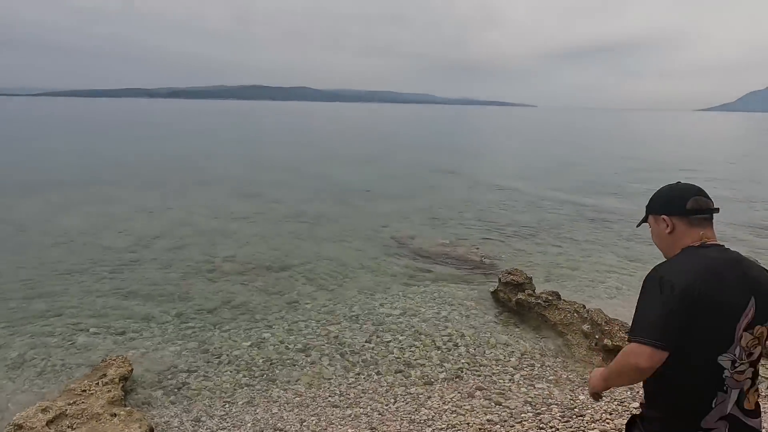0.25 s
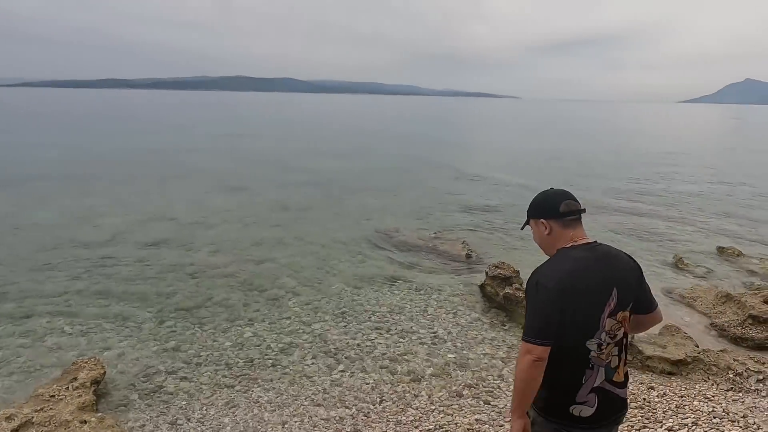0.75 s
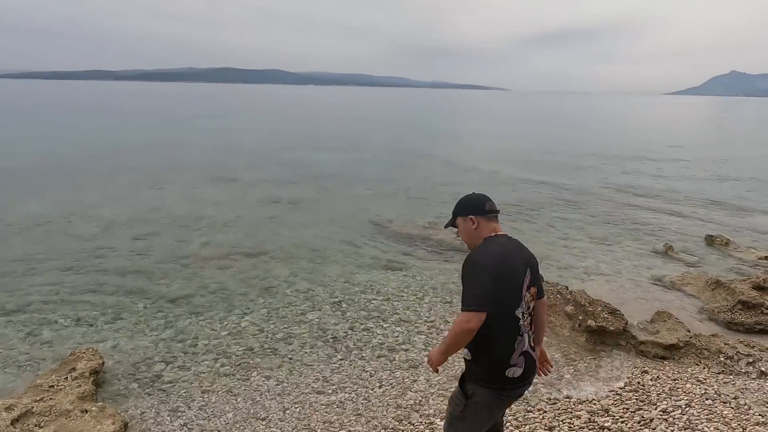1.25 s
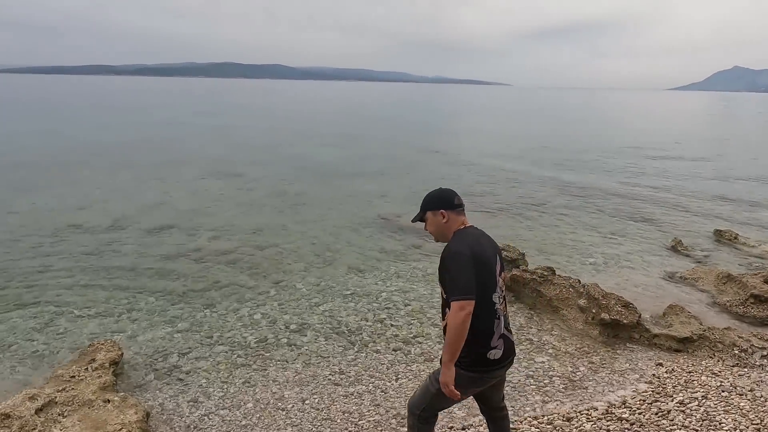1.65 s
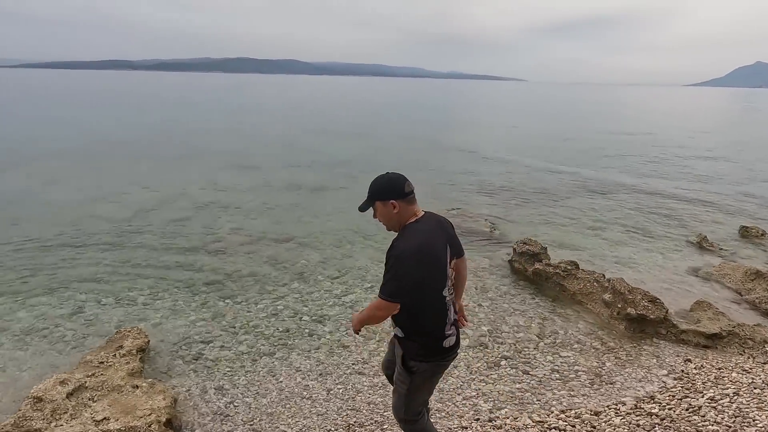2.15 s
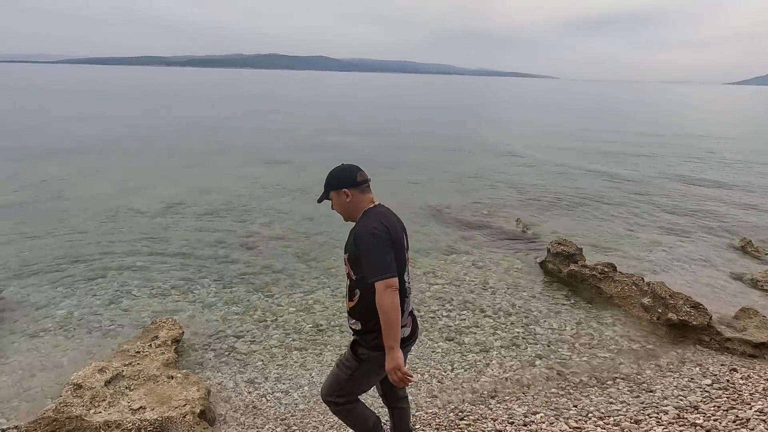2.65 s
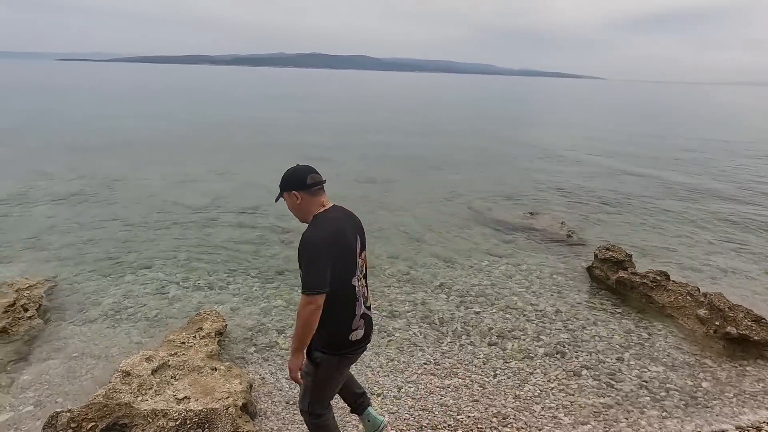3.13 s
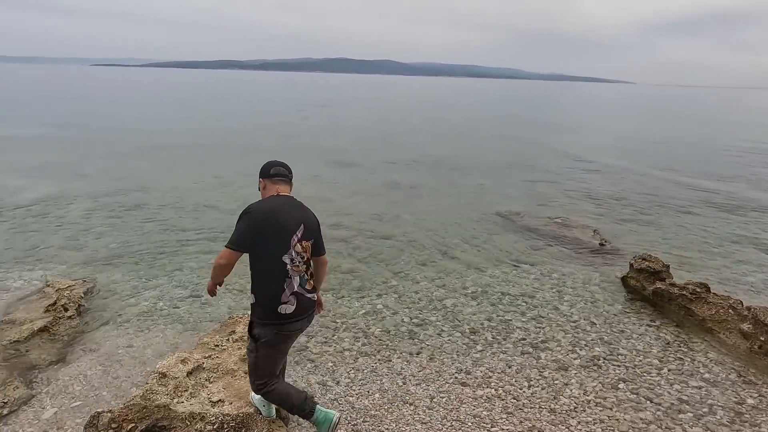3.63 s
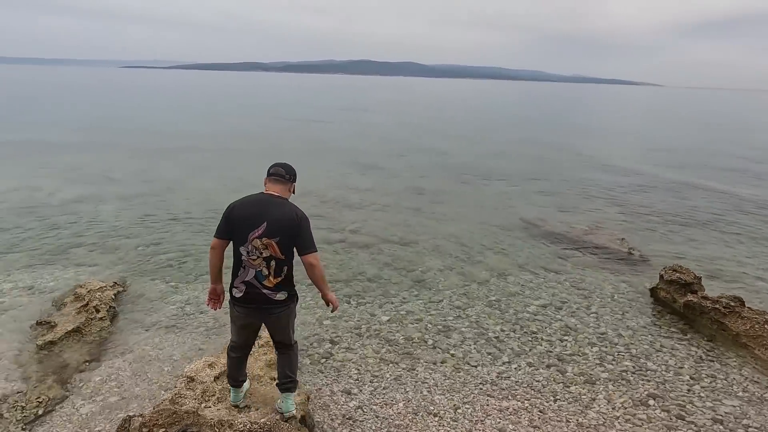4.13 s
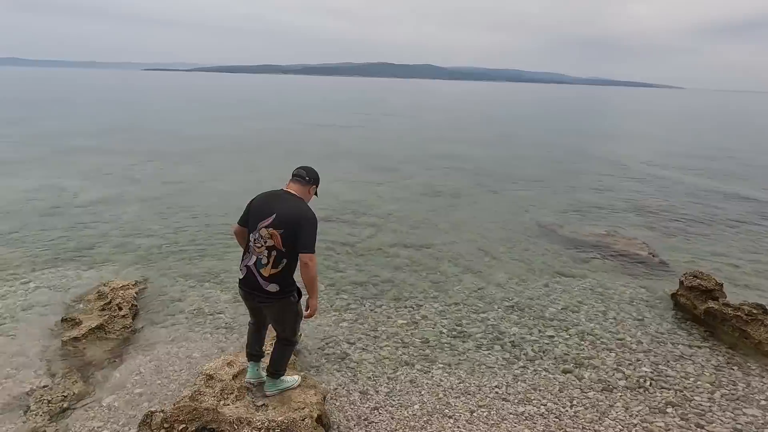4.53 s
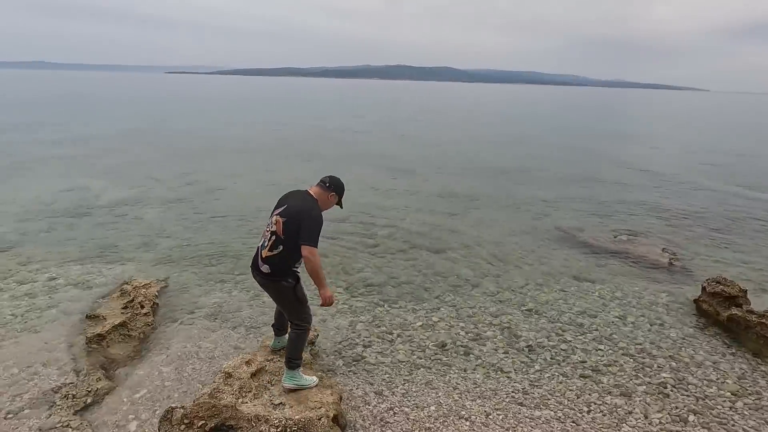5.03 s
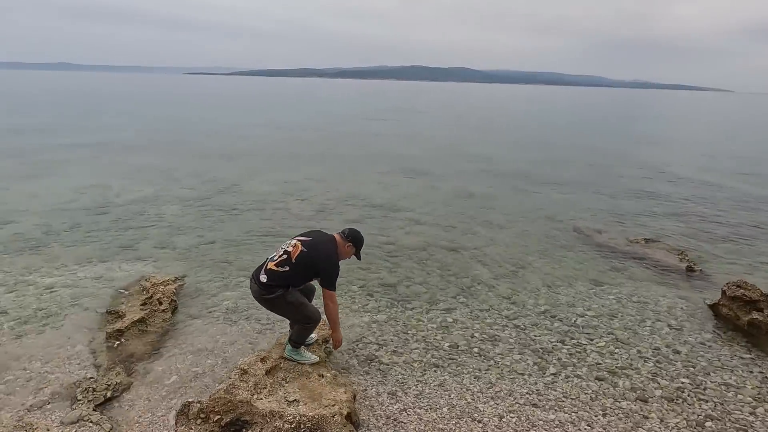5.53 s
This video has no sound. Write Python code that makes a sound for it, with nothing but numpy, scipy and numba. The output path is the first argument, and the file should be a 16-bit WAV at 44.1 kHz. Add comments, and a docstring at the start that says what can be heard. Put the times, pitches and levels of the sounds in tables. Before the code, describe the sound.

Shoes crunch loudly and briskly over loose pebbles with sharp stone clacks, then stop, leaving calm water lapping, plopping and ticking at the shore.

```python
"""A pebble beach: shoes crunch a few metres from a hand-held camera, and the crunching dies out before 4 s.
Steps are thousands of tiny ringing stone contacts that follow the load of each foot; single stones clack.
Calm water laps, plops and gurgles: bubbles ring with rising pitch, droplets tick and spray hisses.
A breeze buffets the microphones as low noise, over a distant sea of smooth noise and a faint hum."""
import sys
import numpy as np
from scipy import signal
from scipy.fft import rfft, irfft, next_fast_len
from scipy.io import wavfile
from scipy.ndimage import uniform_filter1d
from numba import njit

SR = 44100
rng = np.random.default_rng(int(sys.argv[2]) if len(sys.argv) > 2 else 0)


def int16_out(signal):
    """Quantize to a 16-bit WAV file."""
    q = np.round(np.clip(np.atleast_2d(signal).T, -1, 1) * 32767)
    wavfile.write(sys.argv[1], SR, q.astype(np.int16))


def decibels_to_gain(level_db):
    """Convert a level in decibels to a linear amplitude gain (20 dB per decade)."""
    exponent = np.asarray(level_db, float) / 20
    return 10 ** exponent


N = 254898

# Where the walker is. Each row: time in seconds, left minus right in dB.
WALKER = [(0.0, -3), (1.0, -2), (2.0, -.5), (3.0, -2), (3.7, -2)]
# Tone colour of the sea hiss, also given to the spray. Each row: frequency in Hz, relative density in dB per Hz.
SEA_COLOUR = [(59, 5), (100, -14), (189, -5.5), (373, -5), (433, -4.5), (836, -28), (1080, 0.5),
              (1330, 0.5), (4020, -12.5), (5190, -25), (7140, -15.5), (11900, -27.5), (16000, -39)]


def set_level(x, db):
    """Scale a sound to an rms level in dB."""
    return x * decibels_to_gain(db) / np.sqrt(np.mean(x ** 2))


def along_hz(table, hz):
    """Read a spectrum table on a log-frequency axis."""
    points, values = np.transpose(table)
    return np.interp(np.log(hz + 1), np.log(points + 1), values)


def colour(x, table):
    """Filter with the given dB spectrum; folding the cepstrum makes the filter respond only after its input."""
    size = 4096
    log_gain = np.log(decibels_to_gain(along_hz(table, np.fft.rfftfreq(size, 1 / SR))))
    cepstrum = irfft(log_gain)
    cepstrum[1:size // 2] *= 2
    response = irfft(np.exp(rfft(cepstrum[:size // 2], size)), size)
    return signal.fftconvolve(x, response[None], axes=1)[:, :N]


def wander(rate):
    """Random values held for 1 / rate seconds, then smoothed twice; spread near 1."""
    k = int(SR / rate)
    held = np.repeat(rng.standard_normal(N // k + 1), k)
    return 1.135 * uniform_filter1d(uniform_filter1d(held, k), k)[:N]


def noise(width):
    """Two channels of noise that share most of their wave; width sets the part that differs."""
    mid, side = rng.standard_normal((2, N))
    return mid + width * side * np.array([[1], [-1]])


@njit
def rings(s, hz, t60, glide, size, pan, skew):
    """Decaying sines; pitch rises by the share glide over t60; skew is the phase gap between the ears."""
    out = np.zeros((2, N))
    for k in range(len(s)):
        length = t60[k] * SR
        z = size[k] + 0j
        turn = np.exp(1j * skew[k] / 2)
        p = np.exp(2j * np.pi * hz[k] / SR - np.log(1000) / length)
        rise = np.exp(2j * np.pi * hz[k] * glide / SR / length)
        start = int(s[k] * SR)
        for i in range(start, min(start + int(length), N)):
            soft = min((i - start) * hz[k] * 2 / SR, 1.)  # contact builds over half a cycle
            out[0, i] += soft * pan[k] * (z * turn).imag
            out[1, i] += soft / pan[k] * (z / turn).imag
            z, p = z * p, p * rise
    return out


def grains(count, span, low_hz, high_hz):
    """Random times, log-spread pitches, exponential size draws and two normal draws for variety."""
    u = rng.random((count, 3)).T
    place = rng.standard_normal((count, 2)).T
    s = span[0] + (span[1] - span[0]) * u[0]
    hz = low_hz * (high_hz / low_hz) ** u[1]
    return s, hz, -np.log(1 - .999 * u[2]), place


def bursts(rate, fade_s, scatter_db):
    """Envelope of sudden slips, about rate a second, that die away; mean power 1."""
    kicks = (rng.random(N) < rate / SR) * decibels_to_gain(-scatter_db * np.log(1 - .99 * rng.random(N)))
    envelope = signal.lfilter([1], [1, -np.exp(-1 / (fade_s * SR))], kicks)
    return envelope / np.sqrt(np.mean(envelope ** 2))


def knock(s, strength_db, hz, t60, pan_db, count):
    """A main ring inside a cluster of random partner modes; higher modes die sooner."""
    out = rings(s, hz, t60, 0., decibels_to_gain(strength_db - 8), decibels_to_gain(pan_db / 2), 0 * s)
    for u in rng.random((len(s), 2 * count)).T.reshape(count, 2, -1):
        ring_hz = 900 * 15.54 ** u[0] ** 0.68
        ring_t60 = 0.88 * t60 * (4000 / ring_hz) ** 0.091
        # partners far from the main ring are weaker
        db = strength_db - 9.5 - 3.6 * np.abs(np.log2(ring_hz / hz))
        out = out + rings(s + .001 * u[1], ring_hz, ring_t60, 0., decibels_to_gain(db), decibels_to_gain(pan_db / 2), .6 * (u[1] - .5))
    return out


def swell(s, crest, db, rise, hold, fall):
    """Level in dB of each event (columns) at each time (rows): straight rise, hold, straight fall."""
    s = s[:, None]
    before_db = 20 * np.clip((crest - s) / rise, 0, None)
    after_db = 20 * np.clip((s - crest - hold) / fall, 0, None)
    return db - before_db - after_db


def total(db):
    """Power sum of levels along each row."""
    return 10 * np.log10(np.sum(decibels_to_gain(db) ** 2, axis=1) + 1e-18)


def step_load(s, coarse=0., fine=0.):
    """Grinding level under all steps, each with a trickling tail, for stones of the given coarse or fine share."""
    # Feet loading the pebbles. Each row: start of full weight in seconds, relative level in dB,
    # rise in seconds per 20 dB (0 is at once; a negative one quickens the fall), hold in seconds,
    # fall in seconds per 20 dB, extra level of coarse stones in dB, extra level of fine stones in dB.
    steps = [(0.0, -20, -0.5, 0.03, .26, -13, -2.5), (0.278, -19.5, 0.12, .14, .18, -2, -2),
             (0.521, -41, 0, .17, 0.28, -6, 17), (.772, -19, .1, .18, .1, -1, 0),
             (1.045, -31.5, .06, .07, .15, 6, 3), (1.14, -24, .02, .06, 0.25, -8, 5),
             (1.238, -18.5, .12, 0.069, .45, -7, -3), (1.42, -23, .3, .06, .45, -1, 0),
             (1.62, -29, .3, .13, .06, -4, 2), (1.812, -23.5, .012, 0.024, .1, -11, 5.5),
             (2.134, -23, .6, .11, .17, -2.5, -6), (2.429, -26, 0.08, 0.022, 0.12, -6, 4),
             (2.478, -18, 0.02, 0.007, .07, -10, -4), (2.53, -27, .05, .02, .2, -8, -4),
             (2.699, -26.5, 0.3, .04, .05, -10, -7), (2.76, -34, .05, .07, .1, 7, -14),
             (2.869, -29, 0.08, .03, .1, -2, -22), (3.036, -19.5, 0.14, 0.053, 0.21, -1, -6),
             (3.23, -26, .12, .04, .12, -3, -9), (3.4, -35, .1, .04, .1, 0, -10),
             (3.61, -25, .14, .04, .07, -4, -7)]
    crest, db, rise, hold, fall, coarse_db, fine_db = np.transpose(steps)
    coarse, fine = np.reshape(coarse, (-1, 1)), np.reshape(fine, (-1, 1))
    lag = np.minimum(0.03 * coarse, hold)  # seconds; big stones give way later
    step_db = db + coarse * coarse_db + fine * fine_db
    step = swell(s, crest + lag, step_db, rise, hold - lag, fall)
    # loose stones trickle on: quieter than the step, duller, slow to fade (0.9 s per 20 dB)
    tail_db = db - 21.5 + coarse * coarse_db - 5 * fine
    tail = swell(s, crest, tail_db, rise, hold, 0.9)
    return total(np.hstack([step, tail]))


def crunch():
    """Thousands of stone contacts a second; light load leaves quieter, more uneven ticks."""
    # Typical ring of coarse, middle and fine stones in Hz.
    stone_hz = (556, 2520, 9000)
    # Tone colour of the pebbles. Each row: frequency in Hz, relative density in dB per Hz.
    pebble_colour = [(88, -46), (150, -37), (231, 1), (466, -4.5), (612, 3.5), (837, 1), (1120, 4),
                     (2060, 0), (3770, 0.5), (4670, -2.5), (6770, 2), (8560, -5), (10400, -0.5),
                     (13200, -10), (16000, -25)]
    s, hz, draw, place = grains(count=57000, span=(0., 4.), low_hz=278.8, high_hz=16370.0)
    fineness = np.interp(np.log(hz), np.log(stone_hz), [-1, 0, 1])  # -1 coarse, 1 fine
    grit_db = step_load(s, np.clip(-fineness, 0, 1), np.clip(fineness, 0, 1))
    slack = np.clip((-28.5 - step_load(s)) / 15, 0, 1)  # 0 under full weight, 1 when stones just trickle
    scatter_db = np.clip(0.76 + 0.5 * slack + 0.45 * fineness, 0, 4)
    even = np.sqrt(3.5 - scatter_db * np.log(10) / 10)  # offsets the power added by scatter
    share = np.clip(0.09 + 0.6 * slack, 0, .95)
    slip_envelope = bursts(rate=120., fade_s=0.011, scatter_db=5.5)
    slips = 1 - share + share * slip_envelope[(s * SR).astype(int)]
    gain = decibels_to_gain(grit_db + scatter_db * draw) * even * slips * hz / 1000
    t60 = 9.6 * np.exp(0.31 * place[0]) / hz
    pan = decibels_to_gain(np.interp(s, *np.transpose(WALKER)) / 2 + 0.48 * place[0])
    skew = (0.1 + (hz / 12500) ** 9) * place[1]  # the ears differ most in the treble
    contacts = rings(s, hz, t60, 0., gain, pan, skew)
    return decibels_to_gain(-11.0) * colour(contacts, pebble_colour)


def breeze():
    """Low noise that swells and drops as wind buffets the microphones, and dull knocks through the camera body."""
    # Wind strength. Each row: time in seconds, level in dB.
    gusts = [(0.0, -25.5), (0.09, -40), (0.3, -32), (0.51, -33), (0.76, -39), (0.84, -25), (1.05, -46),
             (1.58, -35.5), (1.72, -42), (2.11, -31), (2.32, -43.5), (2.82, -37), (2.97, -45), (3.09, -38),
             (3.4, -47), (3.9, -43), (4.17, -52), (4.28, -36), (4.52, -49), (4.68, -38), (4.95, -45),
             (5.54, -40.5), (5.78, -43.5)]
    # Dull knocks. Each row: start in seconds, strength in dB, ring in Hz, time to fall 60 dB in seconds.
    thumps = [(0.831, -10, 21.7, 0.37), (1.457, -16.5, 238, 0.092)]
    rumble_colour = [(8, 0), (20, 2.5), (40, -5.5), (62, -2.5), (80, -18.0), (110, -13.5),
                     (300, -28), (2000, -85)]  # Hz, relative dB
    rumble = set_level(colour(noise(0.11), rumble_colour), 0)
    gust_db = np.interp(np.arange(N) / SR, *np.transpose(gusts))
    s, strength_db, hz, t60 = np.transpose(thumps)
    knocks = rings(s, hz, t60, 0., -decibels_to_gain(strength_db), 1 + 0 * s, 0 * s)
    return rumble * decibels_to_gain(gust_db) + knocks


def sea():
    """Smooth distant hiss from coloured noise, and a hum of sines wavering in level and pitch."""
    # Hum tones. Each row: average frequency in Hz, average level in dB.
    hum_tones = [(92, -50.5), (366, -62)]
    hiss = set_level(colour(noise(0.35), SEA_COLOUR), -47) * decibels_to_gain(0.35 * wander(12))
    hum = 0
    for hz, db in hum_tones:
        strength = decibels_to_gain(db + 0.89 * wander(4.36))
        moving_hz = hz * (1 + 0.0064 * wander(4.3))
        hum = hum + strength * np.sin(2 * np.pi * np.cumsum(moving_hz) / SR)
    return hiss + hum


def water_motion(s, table, rise, fall, calm_db, calm_hz, wet_db, wet_hz):
    """Level and mean pitch of surges, calm water and wet stones underfoot, weighted by their power."""
    crest, length, surge_db, surge_hz = np.transpose(table)
    surges = swell(s, crest, surge_db, rise, length, fall)
    db = np.column_stack([surges, calm_db + 0 * s, step_load(s) + wet_db])
    hz = np.append(surge_hz, [calm_hz, wet_hz])
    return total(db), decibels_to_gain(db) ** 2 @ hz / np.sum(decibels_to_gain(db) ** 2, axis=1)


def lapping():
    """Overlapping bubbles and spray in flurries; bubbles ring with rising pitch, and droplets tick."""
    # Wavelets fizzing on the rocks. Each row: crest in seconds, length in seconds,
    # relative level in dB, favoured bubble pitch in Hz.
    wavelets = [(3.72, .12, -40, 1400), (3.95, .14, -38, 2000), (4.25, .05, -39, 1150),
                (4.4, .03, -41, 800), (4.5, .16, -35.5, 1250), (4.78, .04, -43, 1800),
                (5.02, 0.05, -37, 1950), (5.18, .02, -43, 1500), (5.32, .13, -40.5, 1600),
                (5.55, .06, -48, 1400), (5.773, .03, -46, 2000)]
    # Surge rise and fall in seconds per 20 dB; calm water's relative level in dB and pitch in Hz;
    # wet stones' level against the step in dB and pitch in Hz.
    fizz_settings = dict(rise=.15, fall=.22, calm_db=-49, calm_hz=1700, wet_db=-10, wet_hz=1600)
    # The loudest bubbles. Each row: start in seconds, strength in dB, starting pitch in Hz.
    loud_bubbles = [(4.002, -32, 1750), (4.049, -33, 2120), (4.13, -33, 644), (4.268, -28, 970),
                    (4.301, -31, 620), (4.403, -30, 1020), (4.483, -24, 1260), (4.502, -21.5, 1090),
                    (4.521, -26, 1570), (4.583, -30, 1000), (4.642, -31, 1220), (4.779, -31, 2050),
                    (4.821, -31, 2400), (5.014, -30.5, 860), (5.037, -24, 2610), (5.086, -22, 1810),
                    (5.134, -26.5, 2070), (5.261, -33.5, 1460), (5.327, -30, 820), (5.418, -28.5, 1130),
                    (5.532, -33, 1300), (5.575, -32, 1260), (5.628, -26, 1440), (5.684, -25.5, 2260)]
    # Droplets and small stones ticking at the waterline. Each row: start in seconds, strength in dB, ring in Hz.
    ticks = [(3.7383, -24, 6480), (3.832, -30, 2860), (3.8708, -17.5, 9100), (3.9019, -28, 4400),
             (4.046, -26, 2990), (4.086, -25, 6760), (4.107, -22.5, 3500), (4.523, -18.5, 2800),
             (4.6572, -23.5, 3150), (4.8922, -27, 4100), (4.9595, -23, 2880), (5.4038, -24, 7400),
             (5.6779, -29, 6950), (5.7346, -25, 7510), (5.7494, -21, 10500)]
    left_db = 2.5 / 2  # half the left minus right dB: fizz and plops lie a little to the left

    s, hz, draw, place = grains(count=9000, span=(0, N / SR), low_hz=540.0, high_hz=4880.0)
    wash_db, pitch_hz = water_motion(s, wavelets, **fizz_settings)
    flurry = .5 + .45 * bursts(rate=28.0, fade_s=0.021, scatter_db=2.5)[(s * SR).astype(int)]
    off_pitch_db = 10.5 * np.abs(np.log2(hz / pitch_hz))
    gain = decibels_to_gain(wash_db + 3.16 * np.minimum(draw, 4.5) - 4 - off_pitch_db) * flurry
    fizz = rings(s, hz, 36.0 / hz, 0.29, gain, decibels_to_gain(left_db + 2.8 * place[0]), .5 * place[1])

    s, hz, draw, place = grains(count=12000, span=(0, N / SR), low_hz=3600.0, high_hz=15000.)
    wash_db, _ = water_motion(s, wavelets, **fizz_settings)
    flurry = 0.56 + bursts(rate=55.0, fade_s=0.013, scatter_db=3.0)[(s * SR).astype(int)]
    gain = decibels_to_gain(.6 * wash_db + 1.54 * draw - 16) * flurry * hz / 1000
    spray = rings(s, hz, 6.85 / hz, 0., gain, decibels_to_gain(1.6 * place[0]), 0.64 * place[1])
    spray = colour(spray, SEA_COLOUR)

    s, strength_db, hz = np.transpose(loud_bubbles)
    t60 = 0.025 * (1000 / hz) ** 0.34  # small, high bubbles die sooner
    plops = rings(s, hz, t60, 0.26, decibels_to_gain(strength_db), decibels_to_gain(left_db + 0 * s), 0 * s)

    s, strength_db, hz = np.transpose(ticks)
    spatter = knock(s, strength_db, hz, 0.0087 + 0 * s, 0 * s, count=4)
    return fizz + spray + plops + spatter


def gurgle():
    """Air pockets ringing near a moving pitch; the deep hollow under the rock answers the low ones."""
    # Water in hollows between the stones. Each row: crest in seconds, length in seconds,
    # relative level in dB, guide pitch in Hz.
    hollows = [(.76, .04, -31, 315), (.9, .04, -32, 240), (1.08, .08, -33, 300), (2.43, .05, -42, 250),
               (2.73, .16, -31, 345), (2.98, .16, -32, 330), (3.22, .14, -39, 330), (3.42, .03, -37, 265),
               (3.55, .06, -39, 220), (4.24, .03, -39, 225), (4.4, .03, -47, 205), (4.52, .12, -36.5, 222),
               (4.74, .01, -42, 205), (4.82, .02, -40, 205), (4.96, .07, -43, 210), (5.39, .06, -43, 212),
               (5.62, .03, -40, 235)]
    # Surge rise and fall in seconds per 20 dB; calm water's relative level in dB and guide pitch in Hz;
    # wet stones' level against the step in dB and guide pitch in Hz.
    gurgle_settings = dict(rise=.07, fall=.1, calm_db=-53.5, calm_hz=250, wet_db=-17, wet_hz=285)
    s, _, draw, place = grains(count=1800, span=(0, N / SR), low_hz=1., high_hz=1.)
    slosh_db, pitch = water_motion(s, hollows, **gurgle_settings)
    deep = rng.random(len(s)) < np.clip((290 - pitch) / 150, 0, .55)
    deep_hz = 192 * np.exp(0.042 * place[0])
    pocket_hz = 1.2 * pitch * np.exp(0.283 * place[0])
    hz = np.where(deep, deep_hz, pocket_hz)
    t60 = np.where(deep, 24., 15.) / hz
    gain = decibels_to_gain(slosh_db + 2.78 * np.minimum(draw, 3.5) - 2.0)
    return rings(s, hz, t60, 0.059, gain, 1 + 0 * s, 0.53 * place[1])


def clacks():
    """Single stones knocking together around the walker, each a short cluster of ringing modes."""
    # Each row: start in seconds, strength in dB, main ring in Hz.
    single_stones = [(0.1001, -0.5, 7740), (0.179, -15.5, 3170), (0.2157, -15, 9000), (0.521, -8, 11000),
                     (0.565, -9, 7290), (0.5885, -8, 7730), (0.6275, -8, 7520), (0.6863, -10, 7040),
                     (1.1027, -10, 6500), (1.135, -2.5, 6500), (1.1535, -0.5, 5490), (1.266, -3, 7700),
                     (1.313, -4, 7050), (1.5399, -10, 3300), (1.65, -7, 7100), (1.708, -8.5, 6250),
                     (1.7389, -8, 3360), (1.793, -13.5, 7640), (1.810, -10, 6000), (1.815, -2, 2280),
                     (1.8255, -5, 5500), (1.8367, -0.5, 7550), (1.909, -9, 7100), (1.923, -5, 4700),
                     (1.9626, -7, 7700), (1.9686, -6, 4970), (2.0184, -0.5, 6400), (2.059, -7, 5970),
                     (2.2693, 0.5, 1480), (2.357, -13, 1550), (2.399, -12, 7060), (2.427, -10.5, 1900),
                     (2.4754, -1.5, 6030), (2.61, -13, 3380), (2.68, -12, 4500), (2.7325, -7, 3620),
                     (2.7776, -15.5, 9600), (2.817, -15, 4000), (2.8635, -8, 1950), (2.9044, -16.5, 2400),
                     (2.953, -7.5, 4180), (3.342, -19, 9000), (3.461, -20, 5000), (3.607, -9, 3650)]
    s, strength_db, hz = np.transpose(single_stones)
    pan_db = np.interp(s, *np.transpose(WALKER)) + 1.8 * rng.standard_normal(len(s))
    return knock(s, strength_db, hz, 0.0086 + 0 * s, pan_db, count=12)


def scene():
    """Everything as it reaches the camera."""
    return crunch() + breeze() + sea() + lapping() + gurgle() + clacks()


def top_cut(x):
    """Nothing passes above the cut-off."""
    return signal.sosfilt(signal.butter(12, 16500, fs=SR, output="sos"), x)


def record(dry):
    """The two microphone ports differ in level and phase by frequency; peaks clip at full scale."""
    # Each row: frequency in Hz, left minus right in dB.
    port_db = [(25, -9.5), (60, -1), (400, 0.5), (4400, 1), (8100, 1.5), (15000, 6.5)]
    # Each row: frequency in Hz, phase by which left leads in radians.
    port_phase = [(30, 0.39), (700, -0.18), (2800, -0.75), (5500, -0.6), (16000, 0.16)]
    size = next_fast_len(N)
    hz = np.fft.rfftfreq(size, 1 / SR)
    half = decibels_to_gain(along_hz(port_db, hz) / 2) * np.exp(.5j * along_hz(port_phase, hz))
    top = 1 / (1 + (hz / 14500) ** 24)  # the microphones fall away steeply at the top
    ports = irfft(rfft(dry, size) * np.array([half, 1 / half]) * top, size)[:, :N]
    return top_cut(np.clip(ports, -1, 1))


dry = scene()
out = record(dry)
int16_out(out)
```